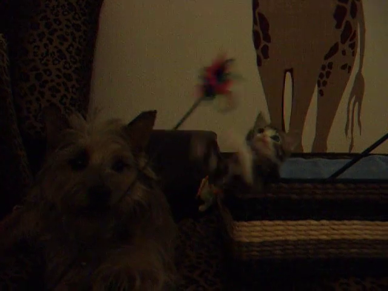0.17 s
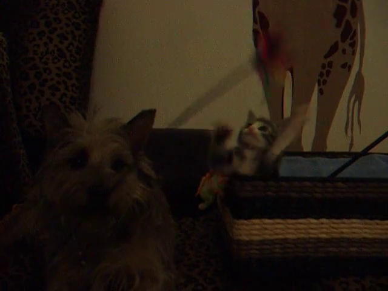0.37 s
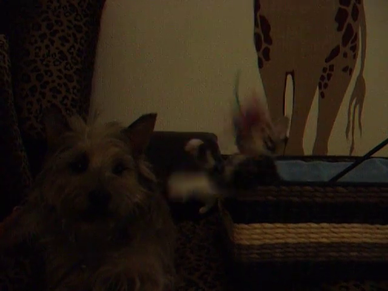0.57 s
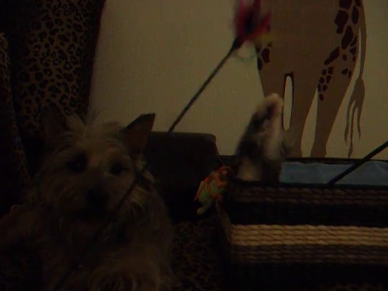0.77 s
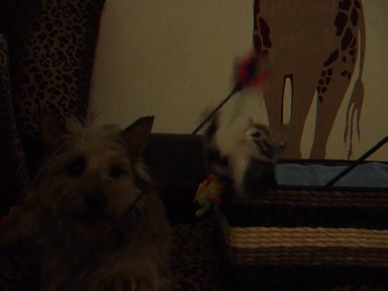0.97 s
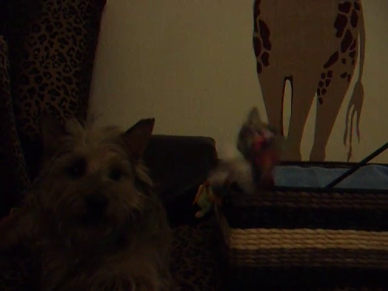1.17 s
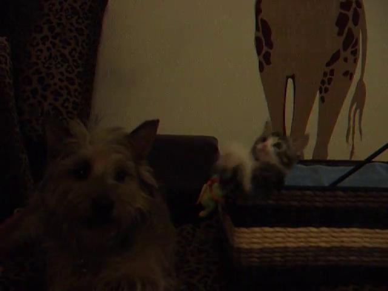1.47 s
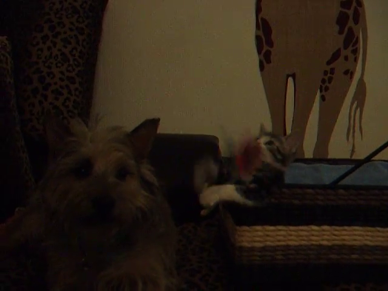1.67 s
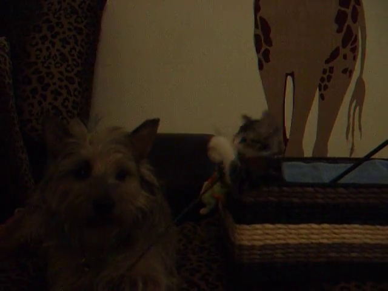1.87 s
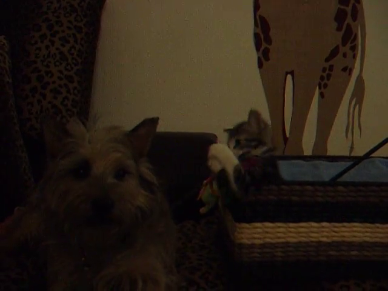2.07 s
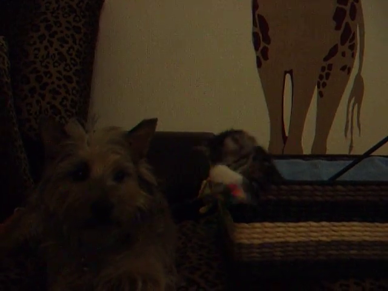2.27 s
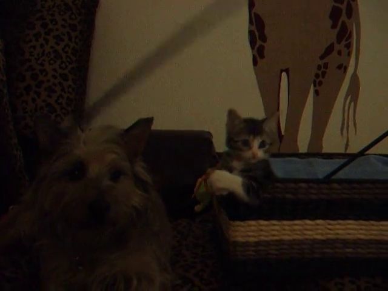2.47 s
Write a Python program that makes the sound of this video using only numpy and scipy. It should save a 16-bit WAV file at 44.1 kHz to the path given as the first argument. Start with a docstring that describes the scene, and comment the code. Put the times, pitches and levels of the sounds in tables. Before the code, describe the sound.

A tiny bell rattles on and off as a kitten bats a feathered wand, over hiss.

```python
"""A quiet, furnished room, where a kitten on a woven basket bats at a feathered wand close to the microphone.
Paws thud softly, feathers and fur swish, and the wand ticks and knocks once with a rebound. A pellet
rattles in the toy's tiny bell in short runs, and near the end a lower piece of metal clinks.
The microphone is a small camera's, in mono: its very coarse converter steps turn its faint noise and
whine into a steady hiss that falters whenever a thud passes."""
import sys
import numpy as np
from scipy import signal
from scipy.fft import rfft, irfft, next_fast_len
from scipy.io import wavfile
from scipy.ndimage import map_coordinates

SR = 44100
rng = np.random.default_rng(int(sys.argv[2]) if len(sys.argv) > 2 else 0)


def wrap_up_sound(samples):
    """Save the sound to the file named by the first command line argument, as 16-bit audio."""
    columns = np.atleast_2d(samples).T
    # keep every value between -1 and 1, then stretch to whole-number steps
    tamed = np.clip(columns, -1, 1)
    steps = np.round(tamed * 32767).astype(np.int16)
    wavfile.write(sys.argv[1], SR, steps)


N = 115983
T = np.arange(N) / SR

# spectrum of brushing feathers and scuffed wicker: frequency_hz, level_db
SWISH_COLOUR = [(300, -15), (1300, -7), (2200, -2), (4000, -2), (5900, 0), (7400, -2), (8200, -8.5),
                (9500, -37.5)]
TICK_LEAD_S = .00065  # a tick starts this far ahead of its hit, as it takes time to peak


def from_db(db):
    """Decibels to gain."""
    return 10 ** (np.asarray(db) / 20)


def noise(colour):
    """Noise of rms 1 with the given spectrum."""
    hz, db = np.transpose(colour)
    size = next_fast_len(N)
    bins_hz = np.maximum(np.fft.rfftfreq(size, 1 / SR), 1)
    gain = from_db(np.interp(np.log(bins_hz), np.log(hz), db))
    x = irfft(rfft(rng.standard_normal(size)) * gain, size)[:N]
    return x / x.std()


def add(out, start_s, sound):
    """Mix a sound in at a time."""
    i = int(start_s * SR)
    out[i:i + len(sound)] += sound[:N - i]


def decay(t, t60_s):
    """An exponential fall of 60 dB in t60_s."""
    return np.exp(-np.log(1000) * t / t60_s)


def ring(hz, t60_s, rise_s=1e-6):
    """A dying sine; a soft contact makes it swell in."""
    t = T[:int(t60_s * SR) + 2]
    return np.sin(2 * np.pi * hz * t) * decay(t, t60_s) * (1 - np.exp(-t / rise_s))


def tick(hz, width_hz):
    """A click through a broad resonance with steep sides; peak 1."""
    edges_hz = np.clip([hz - width_hz / 2, hz + width_hz / 2], 100, SR / 2 - 100)
    resonance = signal.butter(4, edges_hz, "band", fs=SR, output="sos")
    click = signal.sosfilt(resonance, signal.unit_impulse(SR // 100))
    return click / abs(click).max()


def struck_metal(hits, modes, width_hz):
    """Each hit on a small piece of metal gives a bright tick and a faint ring."""
    out = np.zeros(N)
    for time_s, db, hz in hits:
        add(out, time_s - TICK_LEAD_S, from_db(db) * tick(hz, width_hz))
        for mode_hz, mode_db, t60_s in modes:
            add(out, time_s, from_db(db + mode_db) * ring(mode_hz, t60_s))
    return out


def room(x, t60_s=.32, delay_s=.0015):
    """Diffuse reflections of a small furnished room, at the energy of the sound sent in."""
    t = T[:SR // 2]
    tail = rng.standard_normal(len(t)) * decay(t, t60_s) * (t > delay_s)
    return signal.fftconvolve(x, tail / np.linalg.norm(tail))[:N]


def background(hum_hz=200.2, whine_hz=7693.5, pictures_per_s=29.8, slip_turns=.47):
    """Even noise, a faint hum, and the camera's whine, which slips in phase at every picture it takes."""
    # room tone and microphone noise: frequency_hz, level_db
    floor_colour = [(20, 2), (100, 3), (220, 6), (450, 4.5), (800, 3.5), (1400, -1), (3000, -3),
                    (5000, -2.5), (7500, 1), (8000, 1), (8800, -38.5)]
    whine = np.sin(2 * np.pi * (whine_hz * T + slip_turns * np.floor(T * pictures_per_s)))
    hum = np.sin(2 * np.pi * hum_hz * T)
    tones = np.sqrt(2) * (from_db(-63.3) * whine + from_db(-77.5) * hum)  # rms levels
    return from_db(-58.5) * noise(floor_colour) + tones


def basket():
    """Padded paws press the basket down and it swings back, over a low rumble."""
    # the basket rumbles under the kitten: time_s, level_db
    rumble_levels = [(0, -69), (.6, -69), (.75, -64), (.9, -67), (1.05, -64), (1.48, -60.5), (1.58, -68.5),
                     (1.74, -69), (1.82, -62), (2.02, -69), (2.63, -69.5)]
    # spectrum of the rumble: frequency_hz, level_db
    rumble_colour = [(10, -8.5), (25, 1.5), (45, 0), (65, -5.5), (95, -6), (150, -18.5), (400, -44.5)]
    # paws land: start_s, level_db, pitch_hz
    thuds = [(.258, -54, 144.5), (0.509, -56, 184), (.682, -46, 33.6), (.72, -55, 170.5),
             (.745, -53.5, 57.8), (.993, -44.5, 33.6), (1.015, -51.5, 87.8), (1.182, -52, 28.9),
             (1.256, -46, 88.5), (1.265, -49.5, 32.6), (1.89, -46, 31.7), (1.957, -48.5, 32.3),
             (2.24, -54, 156), (2.246, -53, 62.5)]
    out = noise(rumble_colour) * from_db(np.interp(T, *np.transpose(rumble_levels)))
    for start_s, db, hz in thuds:
        add(out, start_s, -from_db(db) * ring(hz, t60_s=.13, rise_s=.003))
    return out


def feathers(grain_s=.0012, grain_db=2.5):
    """Soft swishes swell and fade, finely scratchy as single barbs catch and slip."""
    # feathers and fur brush past: middle_s, half_length_s, level_db
    swishes = [(0.994, 0.0053, -49), (1.135, 0.022, -54.5), (1.255, 0.0063, -52.5), (1.402, 0.019, -55),
               (2.112, 0.043, -54), (2.162, 0.013, -51), (2.36, 0.041, -50)]
    swish = noise(SWISH_COLOUR)
    catches_s = np.arange(0, N / SR + .1, grain_s)
    catch_db = grain_db * rng.standard_normal(N)[:len(catches_s)]
    grain = from_db(np.interp(T, catches_s, catch_db))
    swell = sum(from_db(db) * np.exp(-.5 * ((T - middle_s) / half_s) ** 2)
                for middle_s, half_s, db in swishes)
    return swish * swell * grain / np.sqrt(np.mean(grain ** 2))


def wand(scuff_s=1.764):
    """The wand ticks lightly on the wicker, then knocks and bounces, hollow, as its shaft scuffs."""
    # dry ticks of wand and wicker: time_s, peak_db, centre_hz
    wicker_ticks = [(.8497, -39.5, 5810), (.8503, -45, 3020), (1.031, -47, 3450), (1.2103, -41, 2870),
                    (1.2977, -41, 3500), (1.306, -43.5, 4140)]
    # the knock and its rebound: start_s, level_db, pitch_hz
    knocks = [(1.7635, -30.5, 567), (1.7741, -29.5, 688)]
    # resonances of a knock: pitch_ratio, relative_db, t60_s
    knock_modes = [(0.156, -20.5, .08), (0.269, -18, 0.059), (.5, -13.5, .035), (1.0, 1.5, 0.013),
                   (1.4, -9, .014)]
    scuff_envelope = (T > scuff_s) * decay(abs(T - scuff_s), t60_s=.036)
    out = from_db(-38.5) * noise(SWISH_COLOUR) * scuff_envelope
    for time_s, db, hz in wicker_ticks:
        add(out, time_s - TICK_LEAD_S, from_db(db) * tick(hz, width_hz=1400))
    for start_s, db, hz in knocks:
        for ratio, mode_db, t60_s in knock_modes:
            add(out, start_s, -from_db(db + mode_db) * ring(hz * ratio, t60_s, rise_s=.00044))
    return out


def clink():
    """A piece of metal, lower than the bell, takes one quick cluster of hits and rings on."""
    # hits on the metal: time_s, peak_db, centre_hz
    hits = [(2.4213, -38.5, 6350), (2.4237, -37, 6440), (2.4283, -21.5, 6590), (2.4316, -32, 6430),
            (2.4415, -38, 6400), (2.448, -32, 6460), (2.461, -43.5, 6430)]
    # its ring: pitch_hz, relative_db, t60_s
    modes = [(6032, -26, .07), (6195, -25.5, .3), (6317, -25, .16), (6832, -26, .05)]
    return struck_metal(hits, modes, width_hz=1200)


def bell():
    """A pellet rattles in the toy's tiny bell, which rings briefly after each hit."""
    # the pellet hits the bell: time_s, peak_db, centre_hz
    pellet_hits = [(.0996, -46, 7650), (.1635, -33.5, 7420), (.1672, -28.5, 7620), (.1732, -31, 7320),
                   (.1891, -42, 7620), (.1986, -42, 7620), (.6701, -46, 7250), (.7166, -43, 7720),
                   (.8929, -37.5, 7680), (.8968, -35.5, 7680), (.9386, -34, 7520), (.9531, -41, 7620),
                   (.9941, -43, 7720), (1.0246, -39.5, 7620), (1.0304, -36.5, 7520), (1.0341, -33.5, 7520),
                   (1.0392, -38.5, 7480), (1.3211, -44, 7520), (1.3336, -43, 7520), (1.5796, -43.5, 7720),
                   (1.5821, -44, 7720), (1.6138, -34.5, 7480), (1.6175, -35.5, 7680), (1.6212, -30.5, 7480),
                   (1.6231, -38.5, 7620), (1.6249, -32.5, 7620), (1.631, -37.5, 7480),
                   (1.6331, -33.5, 7580), (2.0066, -36, 7420), (2.012, -33, 7480), (2.0157, -39.5, 7420),
                   (2.0266, -27.5, 7520), (2.0302, -32.5, 7480)]
    # the bell's ring: pitch_hz, relative_db, t60_s
    modes = [(7330, -28, .05), (7476, -26.5, .07), (7835, -29, .05)]
    return struck_metal(pellet_hits, modes, width_hz=1400)


def scene():
    """Everything reaches one microphone; bell, clink and wand also come back off the room."""
    jingle, clinks, knocks = bell(), clink(), wand()
    reflections = room(from_db(-6.5) * jingle + from_db(-12) * clinks + from_db(-10) * knocks)
    microphone = jingle + clinks + knocks + reflections + feathers() + basket() + background()
    return np.tile(microphone, (2, 1))


def record(dry, converter_hz=16000, step_db=-45.5, cutoff_hz=7970):
    """The camera samples slowly in mono, rounds down to coarse steps and smooths with a steep low-pass."""
    step = from_db(step_db)
    bias_steps = .045  # silence rests just above a threshold, so faint noise flips a whole step
    sampled = map_coordinates(dry[0], [np.arange(0, N, SR / converter_hz)], order=3, mode="nearest")
    stepped = step * np.floor(sampled / step + bias_steps)
    up, down = SR // 100, converter_hz // 100
    low_pass = signal.firwin(32 * up + 1, cutoff_hz, window=("kaiser", 9), fs=converter_hz * up)
    smoothed = signal.resample_poly(stepped, up, down, window=low_pass)[:N]
    return np.tile(smoothed, (2, 1))


dry = scene()
out = record(dry)
wrap_up_sound(out)
```